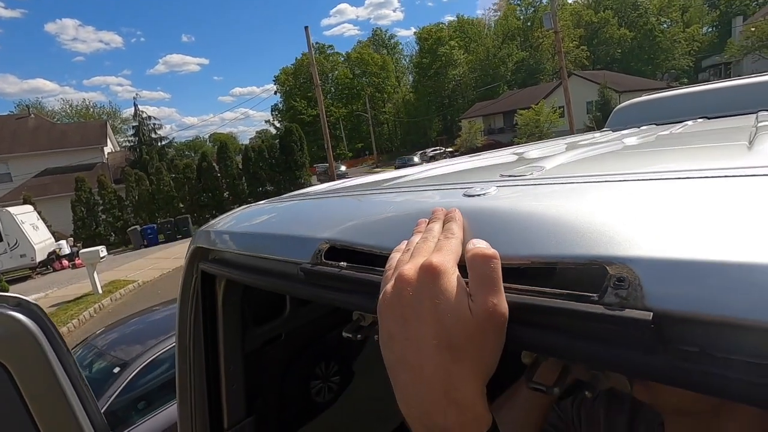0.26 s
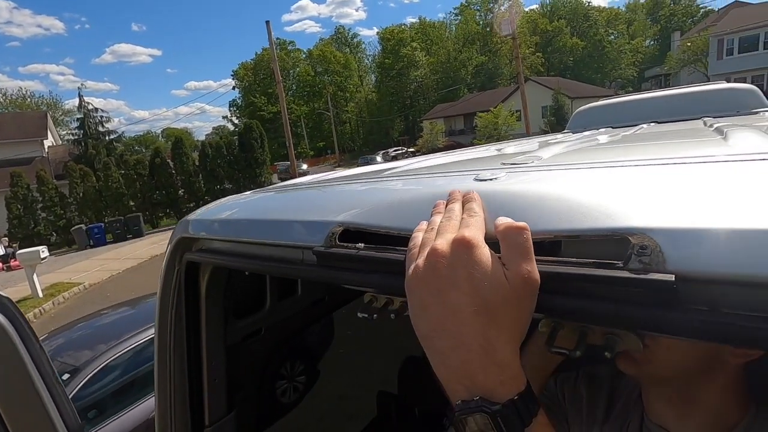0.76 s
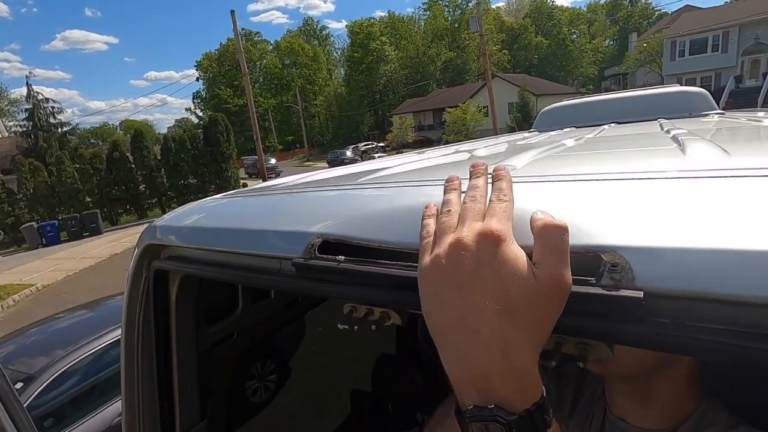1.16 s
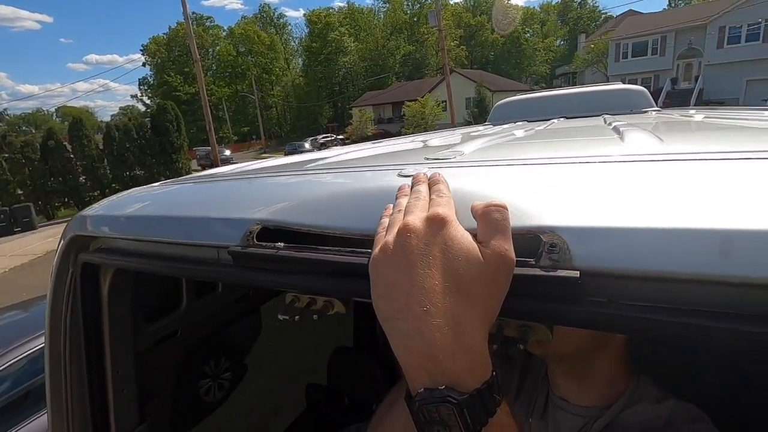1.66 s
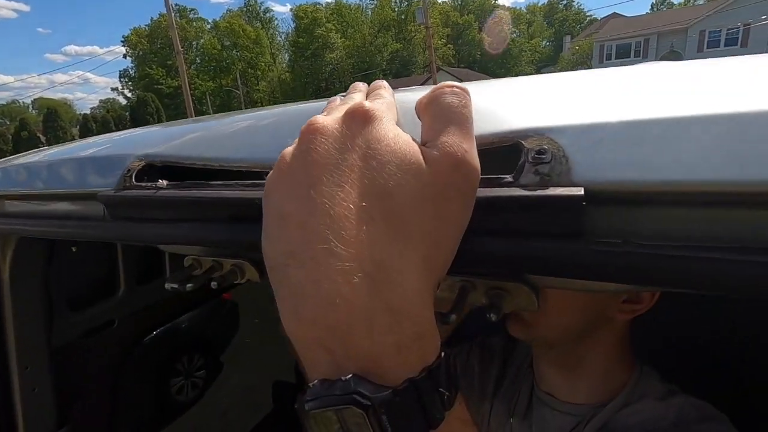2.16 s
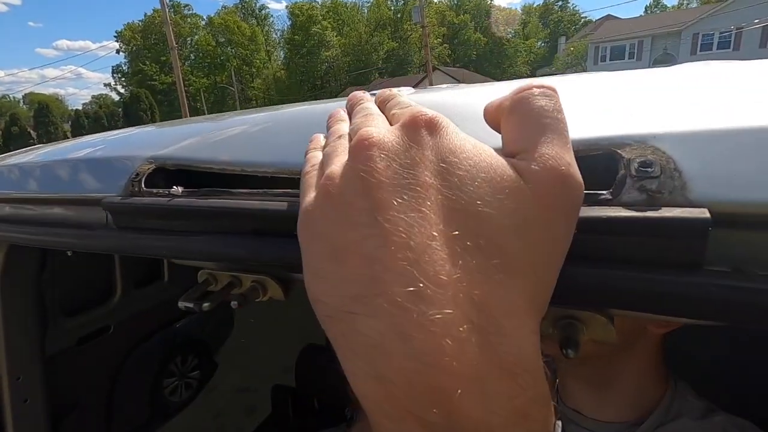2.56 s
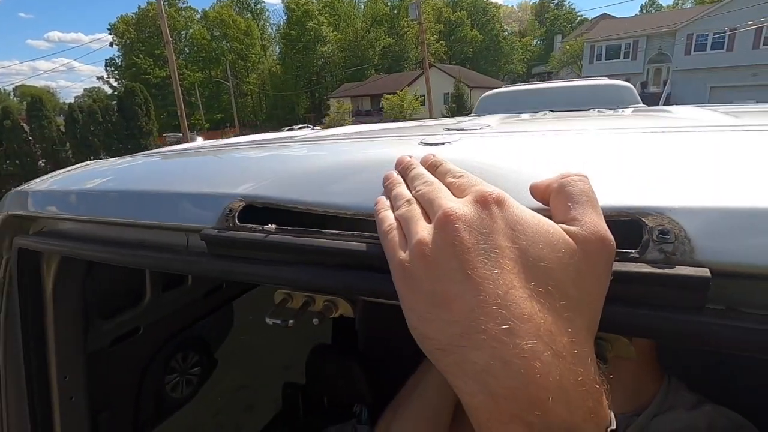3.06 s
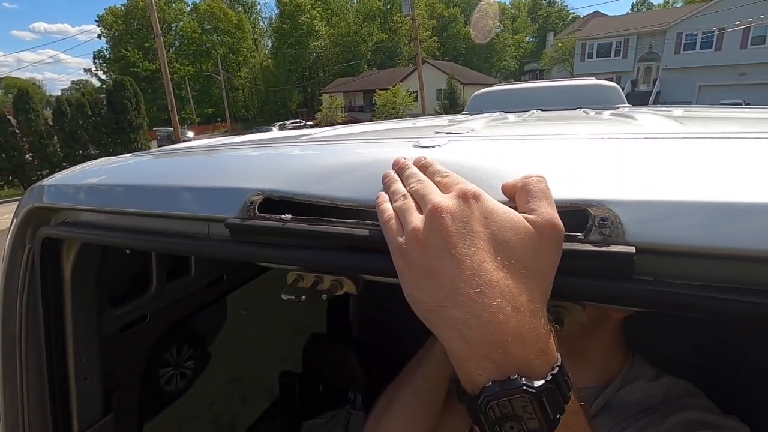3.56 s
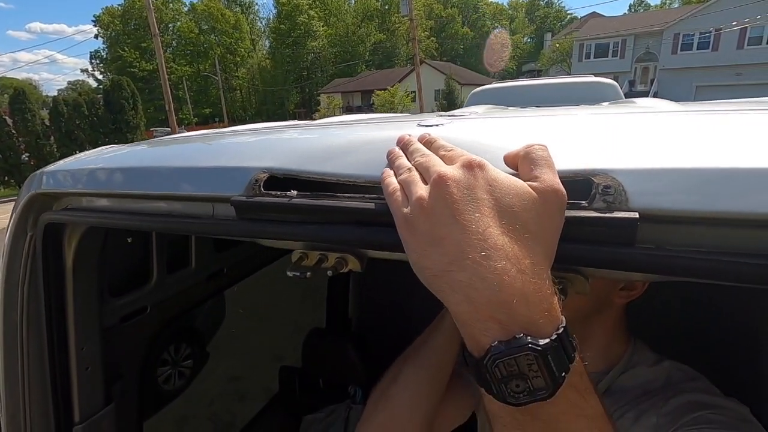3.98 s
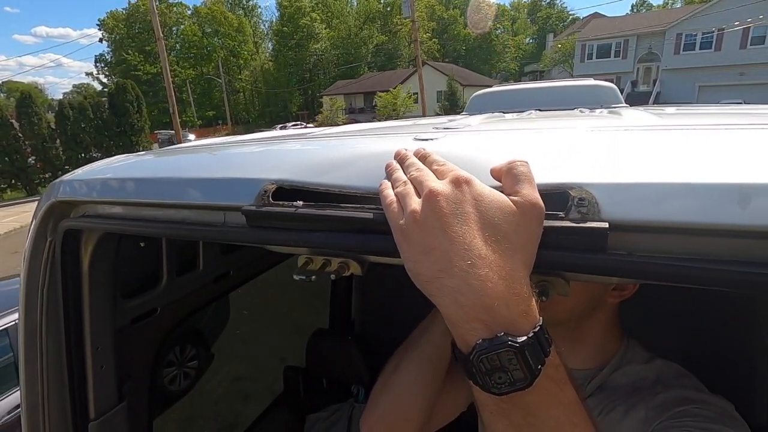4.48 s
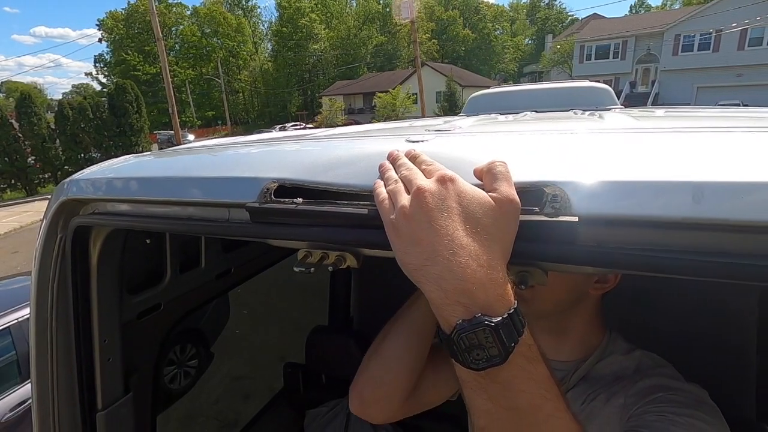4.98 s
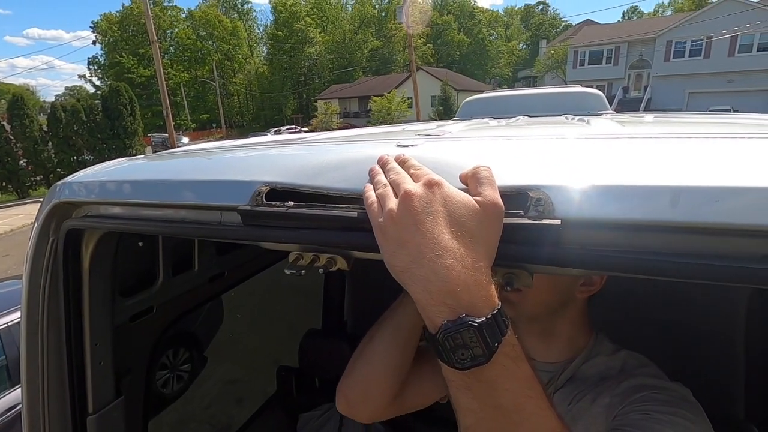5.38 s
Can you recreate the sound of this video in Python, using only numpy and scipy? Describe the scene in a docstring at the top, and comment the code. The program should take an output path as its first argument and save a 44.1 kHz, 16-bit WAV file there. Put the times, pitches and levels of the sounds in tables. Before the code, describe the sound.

Fourteen steady hammer blows bang on a hollow sheet-metal van roof, loose filling rattling between them, in quiet suburban outdoor air.

```python
"""On a suburban street, a dent in a van's sheet-metal roof is knocked out from inside, a hand damping the
panel. Fourteen hammer blows each join a noise crack, a dense noise clang and a boom of decaying panel modes.
Loose filling, as in a dead-blow hammer, is a patter of clicks: a rattle on each backswing, a rush before each
blow. Light knocks (the first as the filling lands just before the second blow) and ticks fall between the
blows; two more knocks and a soft gliding bump follow them. A bird's warbling sine whistles stand in quiet air
of shaped noise, with wind swelling toward the end."""
import sys
import numpy as np
from scipy import signal
from scipy.fft import rfft, irfft, next_fast_len
from scipy.io import wavfile
from scipy.ndimage import uniform_filter1d, minimum_filter1d

SR = 44100
rng = np.random.default_rng(int(sys.argv[2]) if len(sys.argv) > 2 else 0)


def store_wav(level_fs):
    """Save 16-bit WAV to argv[1]."""
    pcm = np.round(np.clip(np.atleast_2d(level_fs), -1, 1) * 32767)
    wavfile.write(sys.argv[1], SR, pcm.T.astype(np.int16))


N = 248062
RING = np.arange(16384) / SR  # time axis of one short sound [s]

# Hammer blows: start_s, force_db, contact_hardness_db, swing_briskness_db, panel_tension [pitch factor]
HAMMER_BLOWS = [(.135, -0.5, -7.5, 5.5, .96), (.497, -2, 6, 0, 1), (0.8766, -1.5, 7.5, -1, 1.06),
                (1.2522, -2.5, 3.5, 0, 1.045), (1.603, -2, 1, -3.5, 1.02), (1.9671, -0.5, 8, 2, 0.94),
                (2.3046, -1.5, -2.5, 3, .97), (2.6648, 1, -5, 6, 1.004), (3.0182, 0.5, -11.5, 1, 1.025),
                (3.3929, 0, -1, 5, 1.0), (3.7652, -2, 0.5, 7, 1.0), (4.1441, -1, 7, 1, .96),
                (4.4829, -1, 7, -1, 1.02), (4.8837, -9.5, -6, 3.5, .94)]
# Scrape-like colour of rushing filling and of the light knocks' scrapes: frequency_hz, relative_level_db [per
# Hz]
RUSH_COLOUR = [(100, 14), (300, 9.5), (650, 16.5), (1000, 12.5), (1400, 3.5), (2200, -1.5), (4000, -11.5),
               (8000, -29), (15000, -103)]
# Stereo width, how unlike the two channels are: frequency_hz, side_level_db [relative to mid]
STEREO_WIDTH = [(60, -59), (200, -61), (380, -13.5), (700, -15.5), (2400, -13), (4400, -15), (9000, -25)]


def amp(db):
    """Decibels to linear gain."""
    return 10 ** (np.asarray(db) / 20)


def evened(x):
    """Scales a signal to an RMS of one."""
    return x / np.sqrt(np.mean(x ** 2) + 1e-20)


def read(points, hz):
    """Reads a table of frequency and value along a log-frequency axis."""
    f, value = np.transpose(points)
    return np.interp(np.log(hz + 1), np.log(f), value)


def add(mix, s, sound):
    """Mixes a sound in at time s, trimming whatever falls outside."""
    at = round(s * SR)
    sound = sound[..., max(-at, 0):]
    part = mix[:, max(at, 0):][:, :sound.shape[-1]]
    part += sound[..., :part.shape[1]]


def noise(size=len(RING)):
    """Two independent channels of white noise, usually a mid and a side drive."""
    return rng.standard_normal((2, size))


def lumps(depth_db, size):
    """An uneven random gain that changes every few milliseconds."""
    wander = evened(uniform_filter1d(rng.standard_normal(size), size=300))
    return evened(amp(depth_db * wander))


def colour(x, spectrum, tilt_db=0, size=2048):
    """Causal filter of unit energy, then tilted (dB per octave) above 1 kHz; turns mid and side into left and right."""
    hz = abs(np.fft.fftfreq(size, 1 / SR))
    octaves = np.log2(np.maximum(hz / 1000, 1))
    gain = evened(amp(read(spectrum, hz))) * amp(tilt_db * octaves)
    response = np.exp(np.conj(signal.hilbert(np.log(gain))))  # minimum phase
    side_response = response * amp(read(STEREO_WIDTH, hz))
    taps = np.fft.ifft([response, side_response]).real
    mid, side = signal.fftconvolve(x, taps, axes=1)[:, :x.shape[1]]
    return np.array([mid + side, mid - side])


def outdoors(air_db=-48, wind_hz=45, breeze_db=-57, gust_db=-37, gust_s=5.84, gust_width_s=0.79):
    """Steady suburban air is shaped noise; a light breeze rumbles at each port and swells toward a gust at the end."""
    # Air spectrum: frequency_hz, relative_level_db [per Hz]
    air_colour = [(25, -13), (60, 11), (130, 2.5), (220, -3), (400, -7), (800, -16), (2000, -21.5),
                  (3200, -35.5), (5000, -40), (9000, -52), (15000, -93.5)]
    low_band = signal.butter(2, [12, wind_hz], "band", fs=SR, output="sos")
    rumble = signal.sosfilt(low_band, noise(N))
    swell = np.exp(-((np.arange(N) / SR - gust_s) / gust_width_s) ** 2)
    wind = amp(breeze_db) + amp(gust_db) * swell
    return amp(air_db) * colour(noise(N), air_colour) + wind * evened(rumble)


def bird(waver=0.04, late_peak=1.6, echo_db=-11, echo_t60=0.91):
    """Distant whistles that warble upward, swell late and end in a quaver, blurred by trees and house fronts."""
    # Whistled notes: start_s, length_s, starting_pitch_hz, level_db
    notes = [(3.834, 0.071, 2710, -57), (5.255, .04, 4500, -66), (5.27, 0.13, 2600, -50)]
    # climb and warble height are shares of the starting pitch
    climb_per_s, warble_hz, warble_depth = 1, 13.3, 0.093
    out = np.zeros((2, N))
    for s, length, hz, db in notes:
        t = np.arange(0, length, 1 / SR)
        way = t / length
        wander = evened(uniform_filter1d(rng.standard_normal(len(t)), size=60))
        quaver = waver * way ** 2 * wander
        warble = warble_depth * np.sin(np.pi * warble_hz * t) ** 2
        pitch = hz * (1 + climb_per_s * t + warble + quaver)
        whistle = np.sin(2 * np.pi * np.cumsum(pitch) / SR)
        add(out, s, amp(db) * np.sin(np.pi * way ** late_peak) * whistle)
    echo = noise() * amp(-60 * RING / echo_t60)
    echo /= np.linalg.norm(echo[0])
    return out + amp(echo_db) * signal.fftconvolve(out, echo, axes=1)[:, :N]


def bump(s=5.385, db=-15, start_hz=210, end_hz=42, drop_s=0.0047, fade_s=0.021, right_db=-6):
    """A soft bump near the microphone: one low push whose pitch drops at once, quieter on the right."""
    out = np.zeros((2, N))
    pitch = end_hz + (start_hz - end_hz) * np.exp(-RING / drop_s)
    turns = np.cumsum(pitch) / SR
    envelope = np.exp(-RING / fade_s) * (1 - np.exp(-RING / 0.00058))
    add(out, s, amp([[db], [db + right_db]]) * np.cos(2 * np.pi * turns) * envelope)
    return out


def die_away(x):
    """Each band fades at the speed of the panel's dense modes."""
    # Clang decay: frequency_hz, t60_s
    clang_decay = [(150, 0.46), (500, 0.17), (1000, 0.18), (2000, 0.16), (4000, 0.12), (8000, 0.061),
                   (14000, 0.085)]
    hz, t, z = signal.stft(x, SR, nperseg=256)
    fade = amp(-60 * t / read(clang_decay, hz)[:, None])
    return signal.istft(z * fade, SR, nperseg=256)[1][:, :x.shape[1]]


def boom(spot=0, tension=1, travel_s=0.00063, swell_s=0.013, scatter_db=1.37, detune=0.0042):
    """The panel's modes at one spot: low bending waves arrive and build up later; no two blows weight them alike."""
    # Roof panel modes: frequency_hz, first_spot_level_db, second_spot_level_db, t60_s
    panel_modes = [(85, -22.5, -24, 0.3), (96.3, -15.5, -17, 0.27), (119.2, -12, -12.5, 0.32),
                   (137.1, -19.5, -18.5, 0.43), (162.6, -4, -5.5, 0.15), (202, -17.5, -19.5, 0.41),
                   (211.1, -7.5, -6, 0.2), (227.9, -7, -11, 0.16), (304, -11, -14.5, 0.073),
                   (343, -23, -15.5, 0.15), (356.1, -6.5, -9.5, 0.13), (417.1, -10.5, -14, 0.19),
                   (440.7, -16.5, -19, 0.23), (531.6, -16.5, -24.5, 0.19), (602.6, -24.5, -13, 0.098),
                   (700, -38, -33, 0.26), (811.4, -24.5, -25, 0.14), (908, -33, -34.5, 0.23),
                   (1034, -34, -44.5, 0.27), (1124, -21, -21.5, 0.05), (1178, -39, -33.5, 0.25),
                   (1386, -38, -33, 0.17), (1555, -29.5, -34.5, 0.17), (1727, -21.5, -20.5, 0.039),
                   (2020, -41, -29.5, 0.12), (2346, -24.5, -35.5, 0.11), (2480, -29.5, -31, 0.1),
                   (2996, -26.5, -43, 0.058), (3290, -35, -31.5, 0.09)]
    modes = np.transpose(panel_modes)[:, :, None]
    hz, db, t60 = modes[0], modes[1 + spot], modes[3]
    weight, shift, lean = rng.standard_normal((3, len(panel_modes), 1))
    slowness = np.sqrt(200 / hz)  # one at 200 Hz, where travel_s and swell_s apply
    path_turns = 2.44 / slowness
    t = np.maximum(RING - travel_s * slowness, 0).astype(np.float32)
    build_up = 1 - np.exp(-t / (swell_s * slowness ** 2))
    envelope = np.exp(-np.log(1000) * t / t60) * build_up
    stretch = tension ** np.minimum(slowness ** 2, 1)  # tension retunes mainly the low modes
    angle = 2 * np.pi * (hz * stretch * (1 + detune * shift) * t - path_turns)
    rings = amp(db + scatter_db * weight) * envelope * np.sin(angle.astype(np.float32))
    mid = rings.sum(0)
    side = (rings * lean * amp(read(STEREO_WIDTH, hz))).sum(0)
    return np.array([mid + side, mid - side])


def light_knocks(head_hz=990, head_s=0.02, head_rise_s=0.0022, scrape_rise_s=0.0036, tick_s=0.0057):
    """Light knocks: a short scrape, a brief ring of the hammer head and a soft panel boom; the first comes as
    the filling lands just before the second blow. Small ticks come in between."""
    # Light knocks: start_s, scrape_level_db, head_ring_db, panel_boom_db
    knocks = [(0.469, -30, -20, -50), (1.1795, -24, -45, -23), (5.138, -35, -71.5, -28),
              (5.506, -34.5, -63, -20)]
    # Small ticks: start_s, level_db
    ticks = [(2.227, -41.5), (2.245, -44), (2.57, -44), (4.0548, -48.5), (5.2132, -48), (5.23, -51.5),
             (5.385, -53)]
    # Tick spectrum: frequency_hz, relative_level_db [per Hz]
    tick_colour = [(200, 13), (2500, 4), (6000, -6.5), (11000, -29.5), (15000, -14)]
    out = np.zeros((2, N))
    head = np.sin(2 * np.pi * head_hz * RING) * np.exp(-RING / head_s) * (1 - np.exp(-RING / head_rise_s))
    soft = signal.butter(2, 700, fs=SR)  # a light knock leaves the upper modes at rest
    for s, db, head_db, panel_db in knocks:
        scrape = die_away(noise()) * (1 - np.exp(-RING / scrape_rise_s))
        scraping = colour(scrape, RUSH_COLOUR, tilt_db=-2)
        panel = signal.lfilter(*soft, boom())
        add(out, s, amp(db) * scraping + amp(head_db) * head + amp(panel_db) * panel)
    for s, db in ticks:
        add(out, s, amp(db) * colour(noise() * np.exp(-RING / tick_s), tick_colour))
    return out


def pellets(spectrum, envelope, per_s=4000, clump_db=2.0, tilt_db=0):
    """A dense patter of tiny random collisions that come in clumps."""
    clicks = noise(N) * (rng.random(N) < per_s / SR)
    return colour(evened(clicks) * envelope * lumps(clump_db, N), spectrum, tilt_db)


def shake(db, length, rise_s=.006, sag_db=6.0, settle_s=0.019):
    """Level of one rattle: the filling lands, sags while it tumbles, and settles."""
    landing = 1 - np.exp(-RING / rise_s)
    settling = np.exp(-np.maximum(RING - length, 0) / settle_s)
    return amp(db - sag_db * RING / length) * landing * settling


def head_ring(envelope, per_s=4000):
    """The pellets drum on the inside of the hammer head and set its modes ringing."""
    # Hammer head modes: frequency_hz, relative_level_db, t60_s
    head_modes = [(628, 0.5, 0.077), (872, -2, 0.13), (995, -1.5, 0.08), (1450, -8.5, 0.057)]
    ring = sum(amp(db - 60 * RING / t60) * np.sin(2 * np.pi * hz * RING) for hz, db, t60 in head_modes)
    ring /= np.linalg.norm(ring)
    clicks = evened(rng.standard_normal(N) * (rng.random(N) < per_s / SR))
    return signal.fftconvolve(clicks * envelope, ring[None], axes=1)[:, :N]


def filling(rattle_db=-38, hard_db=27, rush_db=-28, swell_db=13, head_db=0, rush_clump_db=1.0, rush_tilt_db=-2):
    """The filling lands at the back of the head on each backswing, and rushes forward ahead of the next blow."""
    # Filling heard through the hammer head: frequency_hz, relative_level_db [per Hz]
    rattle_colour = [(60, -83), (200, 14.5), (400, 4), (620, 3), (800, -8.5), (1000, 5), (1300, -32.5),
                     (1800, -30), (2600, -25.5), (5000, -34.5), (9000, -51), (15000, -102)]
    # Hard shakes ring higher: frequency_hz, relative_level_db [per Hz]
    hard_colour = [(100, -33.5), (450, -9), (620, 8.5), (900, 1.5), (1250, 0), (1750, -4), (2200, -20.5),
                   (4000, -37.5), (8000, -50), (15000, -55.5)]
    # Extra jolts as the hammer is aimed: start_s, level_db
    jolts = [(0, -34), (0.052, -47), (3.317, -32), (3.352, -32.5), (4.813, -31)]
    backswing_s, rattle_s, jolt_s = 0.1984, 0.11, 0.051  # delay after a blow, then lengths
    ordinary_rush_s = 0.049
    # dB per dB of swing: a brisker swing rattles louder, and its rush is louder and shorter
    rattle_per_swing, rush_per_swing, haste_per_swing = 0.59, 0.64, .15
    rattle, rush = np.zeros((2, 1, N))
    for (last_s, *_), (_, _, _, swing_db, _) in zip(HAMMER_BLOWS, HAMMER_BLOWS[1:]):
        add(rattle, last_s + backswing_s, shake(rattle_db + rattle_per_swing * swing_db, rattle_s))
    for s, db in jolts:
        add(rattle, s, shake(db, jolt_s))
    for s, force_db, _, swing_db, _ in HAMMER_BLOWS:
        length_s = ordinary_rush_s * amp(-haste_per_swing * swing_db)
        way = np.linspace(0, 1, round(length_s * SR))
        top_db = rush_db + force_db + rush_per_swing * swing_db
        swell = amp(top_db - swell_db * (1 - way)) * np.minimum(2 * way, 1)
        add(rush, s - len(way) / SR, swell)
    hard = amp(hard_db) * rattle ** 2  # the brightness grows faster than the level
    tumbling = pellets(rattle_colour, rattle) + pellets(hard_colour, hard)
    rushing = pellets(RUSH_COLOUR, rush, clump_db=rush_clump_db, tilt_db=rush_tilt_db)
    return tumbling + rushing + amp(head_db) * head_ring(rush)


def blows(boom_db=0, clang_db=-17, clang_rise_s=0.0011, crack_db=-6, crack_s=0.0004,
          slam_s=0.0043, slam_db=-6, likeness=0.72, chatter_db=3, bright_db=0.7):
    """A crack at contact and another as the filling slams home, a clang much alike each time, and the boom."""
    # Dense upper panel modes: frequency_hz, relative_level_db [per Hz]
    clang_colour = [(60, -61), (250, 1.5), (500, 7.5), (950, -2), (1400, -3), (2500, -6.5), (3400, -9.5),
                    (4800, -17.5), (7500, -23), (10000, -37), (15000, -60)]
    # First contact: frequency_hz, relative_level_db [per Hz]
    crack_colour = [(100, -6.5), (500, 29), (1500, 32), (3000, 28), (5000, 15), (8000, 9), (11000, -17),
                    (15000, -39)]
    # a harder contact cracks louder (dB per dB) and brighter (dB per octave per dB)
    crack_per_hardness, tilt_per_hardness = 0.19, 0.26
    clang_per_force = 0.17  # dB per dB: the clang follows the force far less than the boom does
    second_spot_s = 2.5  # later blows land on the second spot
    out = np.zeros((2, N))
    shared = die_away(noise())
    slam = amp(slam_db) * (RING > slam_s) * np.exp(-abs(RING - slam_s) / crack_s)
    contact = np.exp(-RING / crack_s) + slam
    spread = 1 - np.exp(-RING / clang_rise_s)  # the clang takes a moment to fill the sheet
    for s, force_db, hard_db, _, tension in HAMMER_BLOWS:
        tilt_db = bright_db + tilt_per_hardness * hard_db
        chatter = die_away(noise() * lumps(chatter_db, len(RING)))
        clang_drive = np.sqrt(likeness) * shared + np.sqrt(1 - likeness) * chatter
        clang = colour(spread * clang_drive, clang_colour, tilt_db)
        crack = colour(noise() * contact, crack_colour, tilt_db)
        panel = boom(int(s > second_spot_s), tension)
        add(out, s, amp(boom_db + force_db) * panel
            + amp(clang_db + clang_per_force * force_db) * clang
            + amp(crack_db + crack_per_hardness * hard_db) * crack)
    return out


def cabin(x, wet_db=-35, t60=1.0):
    """The van's bare shell hums on faintly after each sound: a decaying noise tail."""
    # Shell spectrum: frequency_hz, relative_level_db [per Hz]
    shell_colour = [(60, -1.5), (130, 6.5), (210, 0), (300, -3.5), (500, -12), (1000, -19.5), (3000, -13.5),
                    (8000, -17.5), (15000, -25)]
    tail = colour(noise(SR) * amp(-60 * np.arange(SR) / SR / t60), shell_colour)
    tail /= np.linalg.norm(tail[0])
    return amp(wet_db) * signal.fftconvolve(x, tail, axes=1)[:, :N]


def ports(x):
    """Two close microphone ports: the left one hears the van later and is shaded in the treble."""
    # Lag of the left port: frequency_hz, lag_rad
    port_lag = [(60, 0), (200, .03), (380, .25), (860, .35), (1400, .5), (3900, 1.15), (6700, 1.3),
                (12000, 1.1)]
    # Balance of the ports: frequency_hz, left_minus_right_db
    port_balance = [(200, 0), (400, -.7), (1200, -1), (2800, .5), (5500, -2), (9000, -5), (14000, -2.5)]
    size = next_fast_len(N + 4096)
    hz = np.fft.rfftfreq(size, 1 / SR)
    # each port takes half of the difference
    half = amp(read(port_balance, hz) / 2) * np.exp(-.5j * read(port_lag, hz))
    return irfft(rfft(x, size) * np.array([half, 1 / half]), size)[:, :N]


def scene():
    """The van's sounds pass through shell and ports; bump, bird and air are added directly."""
    hammering = light_knocks() + filling() + blows()
    return outdoors() + bird() + bump() + ports(hammering + cabin(hammering))


def record(dry, ceiling_db=-3, edge_hz=15600):
    """A fast limiter holds the peaks of the blows; then a low-pass limits the band."""
    gain = np.minimum(1, amp(ceiling_db) / (abs(dry).max(0) + 1e-9))
    limited = dry * uniform_filter1d(minimum_filter1d(gain, size=130), size=130)
    low_pass = signal.firwin(511, edge_hz, window=("kaiser", 9), fs=SR)
    return signal.oaconvolve(limited, low_pass[None], "same")


dry = scene()
out = record(dry)
store_wav(out)
```